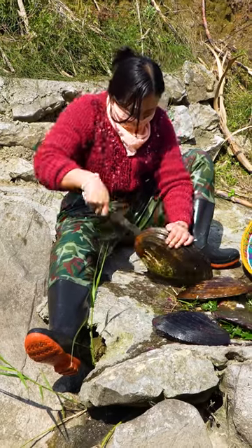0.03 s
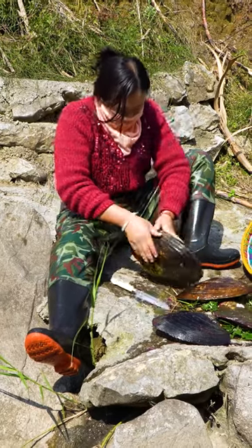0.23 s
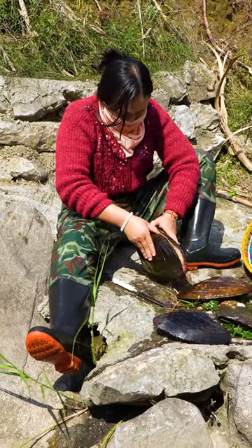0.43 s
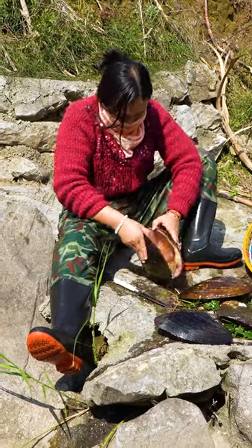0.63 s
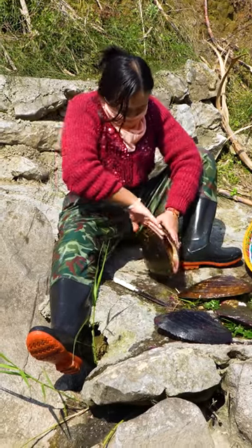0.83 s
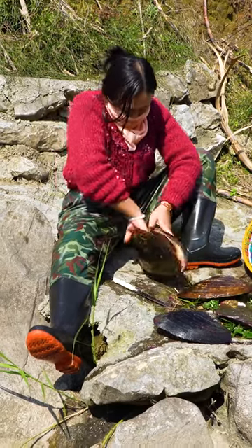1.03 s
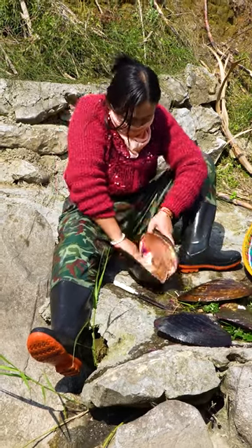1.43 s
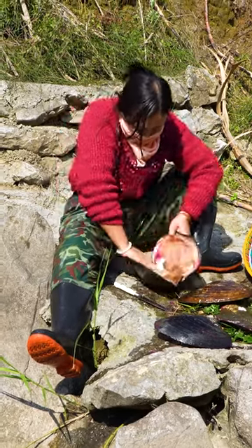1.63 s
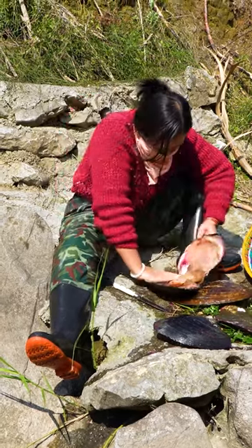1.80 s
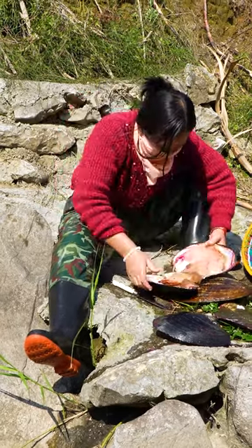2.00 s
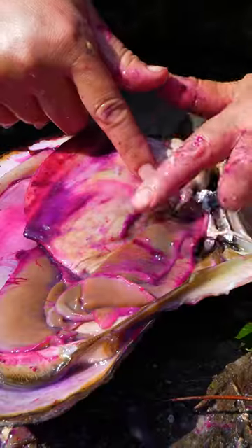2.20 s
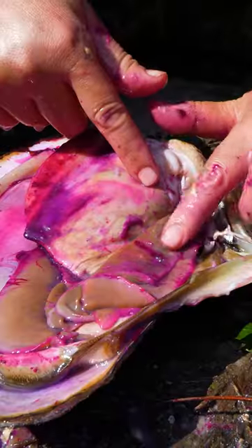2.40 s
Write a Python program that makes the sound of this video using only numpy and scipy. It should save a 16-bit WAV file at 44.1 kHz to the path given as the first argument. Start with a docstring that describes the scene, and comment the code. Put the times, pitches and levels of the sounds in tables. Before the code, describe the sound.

A big shell snaps open and knocks on stone after a knife clatters down.

```python
"""Outdoors, a steel knife is laid on stone and clatters, its blade ringing. Then a big mussel shell is
handled and prised open with sharp snaps, and one half knocks and scrapes down onto the rock. All the
while, light wind rumbles on the microphone over a faint hiss of air. Near the end the background drops
abruptly to a quieter hush, followed by a tiny tick and the soft rub of a finger on the shell."""
import sys
import numpy as np
from scipy import signal
from scipy.fft import rfft, irfft, next_fast_len
from scipy.io import wavfile
from scipy.ndimage import uniform_filter1d, map_coordinates

SR = 44100
rng = np.random.default_rng(int(sys.argv[2]) if len(sys.argv) > 2 else 0)


def transcribe(u):
    """Save the signal u as a 16-bit wav file named by the first command-line argument.

    u: samples, shape (n,) or (channels, n), limited to [-1, 1]; the rate is SR.
    q: integer samples, one column per channel.
    """
    v = np.clip(np.atleast_2d(u).T, -1, 1)
    q = np.round(v * 32767).astype(np.int16)
    wavfile.write(sys.argv[1], SR, q)


N = 112454

# the shell's edges snapping (time [s], body level [dB], treble level [dB], pitch [Hz])
SHELL_SNAPS = [(0.4743, -33.5, -27, 1400), (0.4814, -22, -21.5, 1422), (1.342, -37.5, -36, 1700),
               (1.3975, -26.5, -33.5, 1910), (1.4414, -17.5, -12.5, 1282), (1.4667, -17, -10, 1378),
               (1.521, -36.5, -31.5, 1606), (1.571, -42.5, -32.5, 1360), (1.6186, -45.5, -34, 1320),
               (1.648, -23.5, -23.5, 1307), (1.6514, -22.5, -19, 1364), (1.779, -35, -22.5, 1350),
               (1.7971, -31, -27, 1430), (1.8115, -28.5, -30, 1340), (1.8491, -24, -15.5, 1504),
               (1.8602, -24.5, -24.5, 1210), (2.107, -47, -53, 1290)]
# the shell hitting stone; softer is duller (time [s], level [dB], pitch [Hz], treble limit [Hz])
SHELL_KNOCKS = [(0.492, -24.5, 1270, 4000), (1.7433, -15.5, 1426, 9070), (1.801, -7.5, 1399, 14000),
                (1.821, -24, 1160, 2200), (1.873, -28, 1260, 2560), (1.901, -17.5, 1249, 2350),
                (1.9117, -20.5, 1285, 2600), (1.9233, -23, 1193, 2390)]
# soft taps on the closed shell (time [s], level [dB], pitch [Hz])
SHELL_TAPS = [(0.048, -25.5, 1172), (0.433, -37, 1335), (.751, -36, 1190), (0.829, -36, 2506)]
# the knife hitting stone (time [s], body level [dB], treble level [dB], high ring [dB], clang [Hz])
KNIFE_HITS = [(0.1935, -20.5, -31.5, -54.5, 3200), (.2147, -23.5, -33, -29, 2350),
              (.228, -17, -14, -30, 5600), (0.2294, -11.5, -14.5, -6, 4400), (0.244, -32, -44, -50, 4400),
              (0.2627, -30, -36, -27.5, 4000), (.274, -28, -41, -50, 2400), (.2772, -27, -52, -57, 3000),
              (0.2993, -25, -34, -34, 2400), (0.3072, -23, -35, -30.5, 2330)]
# ringing tones; each hit retunes the shell's (pitch [Hz], level [dB], time to fade by 60 dB [s])
SHELL_LOW_TONES = [(1290, 1, .028), (2080, -6, .012)]
SHELL_HIGH_TONES = [(3664, -8, 0.021), (4944, -9.5, 0.021), (7340, -0.5, 0.0071), (9200, -14.5, 0.018)]
KNOCK_TONES = [(1370, -18, 0.12), (610, -17, 0.02), (1272, 2, 0.014), (2052, 4.5, 0.006),
               (3370, -3, 0.0092)]
TAP_TONES = [(1173, -0.5, 0.035), (1116, -5, 0.012), (530, -10.5, 0.015)]
BLADE_LOW_TONES = [(1290, 0, 0.02), (2356, -20.5, 0.091), (4020, -26, 0.073)]
BLADE_HIGH_TONES = [(7596, 0, .028), (13070, -11, .026)]
# scuffs, handling bumps and a finger on the wet shell (middle time [s], half length [s], level [dB])
SCUFF_STROKES = [(0.124, 0.011, -50.5), (0.346, 0.014, -46), (0.432, 0.0069, -51.5), (0.499, 0.017, -41),
                 (0.533, 0.0046, -37), (0.554, 0.0046, -40.5), (0.751, 0.0088, -45.5),
                 (.835, 0.0037, -44.5), (1.255, 0.0057, -46.5), (1.405, 0.011, -38.5), (1.641, 0.0045, -37)]
HANDLING_BUMPS = [(0.748, 0.012, -35.5), (1.064, 0.021, -36.5), (1.163, 0.017, -36.5),
                  (1.578, 0.016, -37.5), (2.027, 0.022, -41.5)]
FINGER_RUB = (2.245, 0.023, -57.5)
# how loud the sliding shell and the wind are as time passes (time [s], level [dB])
SCRAPE_LEVELS = [(1.76, -51), (1.81, -40), (1.919, -35), (1.976, -46.5), (2.03, -78)]
WIND_LEVELS = [(0.281, -55.5), (.34, -42.5), (.4, -51.5), (.465, -42.5), (.53, -52), (.76, -43.5),
               (1, -47.5), (1.06, -33), (1.12, -37.5), (1.36, -37), (1.48, -49.5), (1.58, -40),
               (1.719, -57), (1.931, -38.5), (2.061, -31)]
# the "colour", or mix of low and high, of each kind of hit (frequency [Hz], relative level [dB])
SHELL_COLOUR = [(200, -30.5), (580, -13), (950, -25.5), (1450, 0), (3500, -6), (7000, -18), (16000, -29)]
STONE_COLOUR = [(200, -41), (550, -2.5), (780, -8.5), (1300, 6), (3800, -5.5), (5000, -14.5),
                (16000, -24.5)]
KNIFE_COLOUR = [(250, -55.5), (520, -0.5), (780, -8.5), (1200, 6.5), (3200, 5), (4800, -2), (16000, -15)]
CRACK_COLOUR = [(500, -32.5), (2000, -27), (4500, 11), (7500, 15), (10000, 10.5), (14000, 15.5),
                (16500, -7.5)]
# the colours of sliding and handling (frequency [Hz], relative level [dB])
SCRAPE_COLOUR = [(300, -2), (620, 1), (1200, -3.5), (2300, -1), (4900, -9), (6300, -13.5), (9600, -14),
                 (10600, -1), (11400, -18.5), (16000, -17)]
CRUNCH_COLOUR = [(350, -18), (650, -2), (1300, 1.5), (2400, -8), (5000, -32.5)]
SCUFF_COLOUR = [(800, -15.5), (1400, 3), (2050, -5), (2800, -6.5), (4200, -17), (16000, -20.5)]
BUMP_COLOUR = [(50, -23), (180, 2.5), (350, -5), (650, -18.5), (2500, -53)]
# the colours of the wind, the air and the closing hush (frequency [Hz], relative level [dB])
WIND_COLOUR = [(20, -16.5), (60, -0.5), (150, 1), (250, -6), (650, -27), (4000, -68)]
AIR_COLOUR = [(250, -14), (550, 3.5), (4770, -4), (15500, -7)]
HUSH_COLOUR = [(300, 2.5), (650, 0), (2360, -10), (15500, -16.5)]
HISS_TOP_HZ, TOP_HZ = 15900, 16900  # upper limits of the long noises and of the whole sound


def shell_snaps():
    """The brittle shell cracks brightly and rings hollow, at a pitch that shifts with the grip."""
    out = np.zeros(N)
    for start, body_db, treble_db, ring_hz in SHELL_SNAPS:
        tuning = ring_hz / SHELL_LOW_TONES[0][0]
        body = burst(SHELL_COLOUR, fade_s=0.011) + ring(SHELL_LOW_TONES, tuning)
        crack = burst(CRACK_COLOUR, fade_s=0.011)
        high_ring = ring(SHELL_HIGH_TONES, tuning * rng.uniform(0.94, 1.06))
        add(out, start, amp(body_db) * body + amp(treble_db) * (crack + high_ring))
    return out


def shell_knocks():
    """The shell rings briefly when it knocks on stone or is softly tapped."""
    out = np.zeros(N)
    for start, db, ring_hz, limit_hz in SHELL_KNOCKS:
        clack = burst(STONE_COLOUR, fade_s=0.012, strike_db=2)
        tones = ring(KNOCK_TONES, ring_hz / KNOCK_TONES[0][0])
        muffle = signal.butter(2, min(limit_hz, TOP_HZ), fs=SR)
        add(out, start, amp(db) * signal.lfilter(*muffle, clack + tones))
    for start, db, ring_hz in SHELL_TAPS:
        tones = ring(TAP_TONES, ring_hz / TAP_TONES[0][0])
        clack = amp(-21) * burst(STONE_COLOUR, fade_s=0.04)
        add(out, start, amp(db) * (tones + clack))
    return out


def knife_clatter(clang_db=1.5, clang_fade_s=0.011, damping_s=0.002):
    """Each spot of the knife clangs differently on the rock; the next hit stops the steel's high ring."""
    out = np.zeros(N)
    next_starts = [hit[0] for hit in KNIFE_HITS[1:]] + [N / SR]
    for (start, body_db, treble_db, high_db, clang_hz), next_start in zip(KNIFE_HITS, next_starts):
        high_ring = ring(BLADE_HIGH_TONES)
        since_next_hit = np.maximum(start + seconds(len(high_ring)) - next_start, 0)
        high_ring *= np.exp(-since_next_hit / damping_s)
        clack = amp(-2) * burst(KNIFE_COLOUR, fade_s=0.01)
        body = clack + ring(BLADE_LOW_TONES + [(clang_hz, clang_db, clang_fade_s)])
        crack = burst(CRACK_COLOUR, fade_s=0.012)
        add(out, start, amp(body_db) * body + amp(treble_db) * crack + amp(high_db) * high_ring)
    return out


def friction():
    """Handling makes scuffs and bumps, the shell hisses and crunches over rock, and a finger rubs it."""
    scuffs = sum(swell(*stroke) for stroke in SCUFF_STROKES) * noise(SCUFF_COLOUR, grit_db=3.5)
    bumps = sum(swell(*bump) for bump in HANDLING_BUMPS) * noise(BUMP_COLOUR)
    crunch = amp(-6) * noise(CRUNCH_COLOUR, grit_db=8)
    hiss = amp(-2.5) * noise(SCRAPE_COLOUR, grit_db=3)
    slide_db = np.interp(seconds(N), *np.transpose(SCRAPE_LEVELS), left=-120, right=-120)
    rub = swell(*FINGER_RUB) * noise(AIR_COLOUR)
    return scuffs + bumps + amp(slide_db) * (hiss + crunch) + rub


def stone_echo(sound, echo_db=-22, fade_s=0.09, rise_s=0.0028):
    """The sound plus a faint, short echo scattered by the stone bank."""
    t = seconds(SR // 3)
    tail = rng.standard_normal(len(t)) * amp(-60 * t / fade_s) * (1 - np.exp(-t / rise_s))
    echo = signal.fftconvolve(sound, tail / np.linalg.norm(tail))[:N]
    return sound + amp(echo_db) * echo


def wind_and_air(flutter_db=2, air_db=-54.5, hush_db=-63, drop_at_s=2.076):
    """Wind rumbles on the microphone and the air hisses; both give way abruptly to a quieter hush."""
    gust_db = np.interp(seconds(N), *np.transpose(WIND_LEVELS)) + flutter_db * wobble(25.01)
    wind = amp(gust_db) * noise(WIND_COLOUR)
    air = amp(air_db) * noise(AIR_COLOUR, grit_db=1.5)
    hush = amp(hush_db) * noise(HUSH_COLOUR)
    before_drop = np.clip((drop_at_s - seconds(N)) / 0.0017, 0, 1)
    return before_drop * (wind + air) + (1 - before_drop) * hush


def burst(colour, fade_s, strike_db=-15, size=8192):
    """The noise of one hit: a sharp strike and a rattle that quickly dies away."""
    rattle = rng.standard_normal(size) * amp(-60 * seconds(size) / fade_s)
    spectrum = rfft(rattle / np.linalg.norm(rattle)) + amp(strike_db)
    own_colour = np.sqrt(np.abs(uniform_filter1d(np.abs(spectrum) ** 2, size=120)) + 1e-12)
    gain = colour_gain(colour, np.fft.rfftfreq(size, 1 / SR)) / own_colour
    # turn the gain into a filter that makes no sound ahead of the strike
    log_filter = irfft(np.log(gain))
    shaping = np.exp(rfft(2 * log_filter[:size // 2], size))
    hit = irfft(spectrum * shaping) * (np.arange(size) < size // 2)
    return hit / np.linalg.norm(hit) * np.sqrt(SR / 1000)  # as much energy as 1 ms at level 1


def ring(tones, tuning=1, rise_s=0.00063, size=8192):
    """A struck object rings with fading tones, in a slightly different mix each time."""
    t = seconds(size)
    out = np.zeros(size)
    for hz, db, fade_s in tones:
        sign = rng.choice([-1, 1])
        level = amp(db + rng.normal(0, 1.66) - 60 * t / fade_s)
        out += sign * level * np.sin(2 * np.pi * hz * tuning * t)
    return out * (1 - np.exp(-t / rise_s))


def noise(colour, grit_db=0):
    """Noise of a given colour; grit_db makes its level flicker fast, which sounds gritty."""
    source = rng.standard_normal(N) * amp(grit_db * wobble(900))
    shaped = filtered(source, lambda hz: colour_gain(colour, hz) * (hz < HISS_TOP_HZ))
    return shaped / np.sqrt(np.mean(shaped ** 2) + 1e-20)  # average power of 1


def swell(middle_s, half_s, db):
    """A level that rises and falls in a bell shape."""
    return amp(db) * np.exp(-((seconds(N) - middle_s) / half_s) ** 2 / 2)


def wobble(rate):
    """A smooth curve through `rate` random values a second."""
    return map_coordinates(rng.standard_normal(int(N * rate / SR) + 4), [seconds(N) * rate])


def colour_gain(colour, hz):
    """How strong a colour is at each frequency, joining the points of its table."""
    points_hz, points_db = np.transpose(colour)
    return amp(np.interp(np.log(hz + 1), np.log(points_hz + 1), points_db))


def filtered(sound, gain_at):
    """Turn each frequency up or down by gain_at(hz)."""
    size = next_fast_len(N + SR // 2)
    return irfft(rfft(sound, size) * gain_at(np.fft.rfftfreq(size, 1 / SR)), size)[:N]


def add(track, start_s, sound):
    """Mix a sound into the track at a given time."""
    part = track[round(start_s * SR):][:len(sound)]
    part += sound[:len(part)]


def amp(db):
    """Turn decibels into a number to multiply by."""
    return 10 ** (np.asarray(db) / 20)


def seconds(size):
    """The time of each sample."""
    return np.arange(size) / SR


def scene():
    """Knife and shell on the rock, in the open air."""
    hits = knife_clatter() + shell_snaps() + shell_knocks()
    return (stone_echo(hits) + friction() + wind_and_air())[None]


def record(dry):
    """The microphone keeps nothing above its highest frequency."""
    return filtered(dry[0], lambda hz: hz < TOP_HZ)[None]


dry = scene()
out = record(dry)
transcribe(out)
```